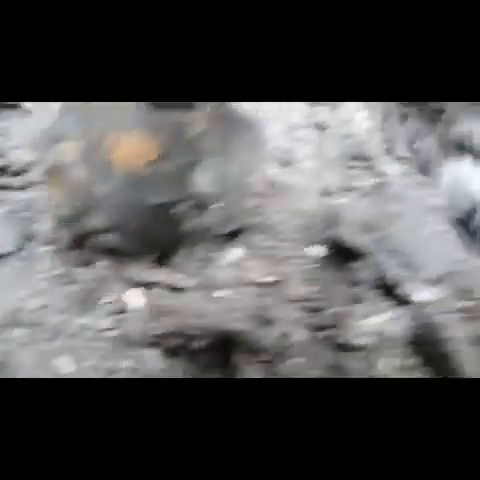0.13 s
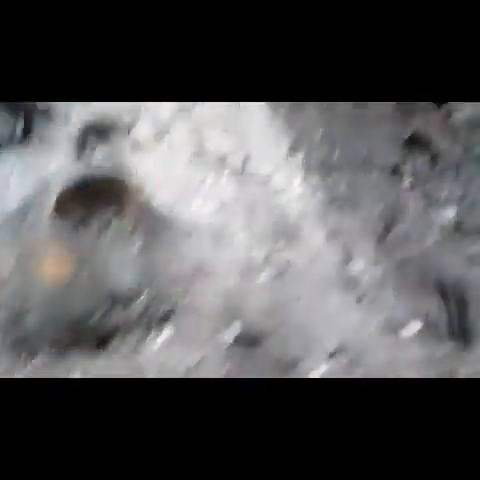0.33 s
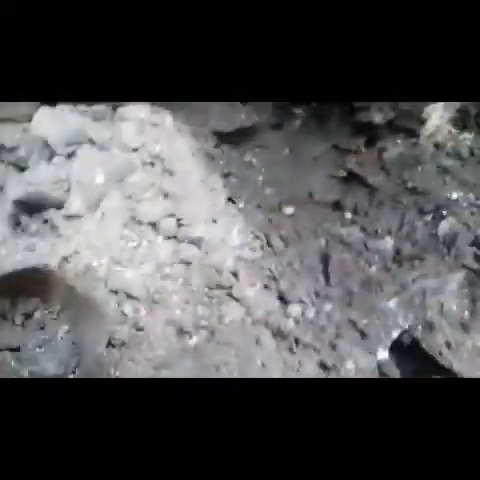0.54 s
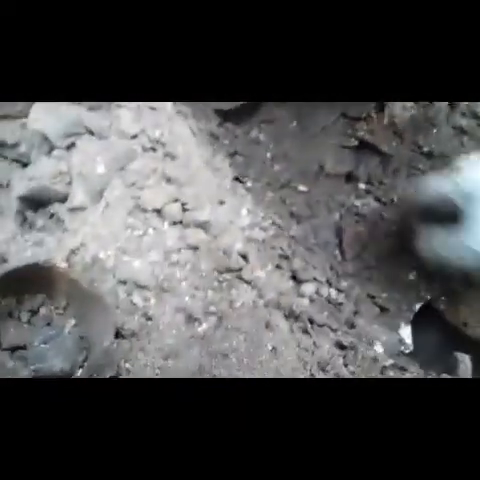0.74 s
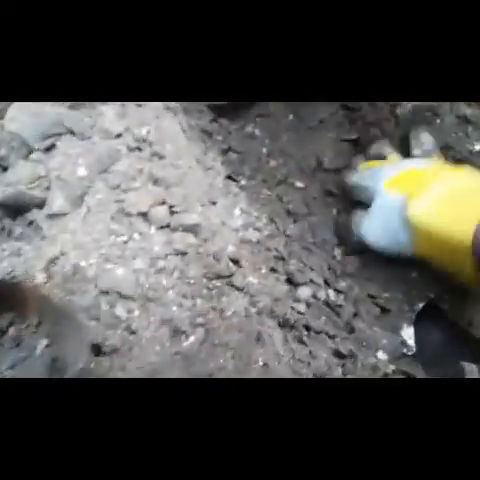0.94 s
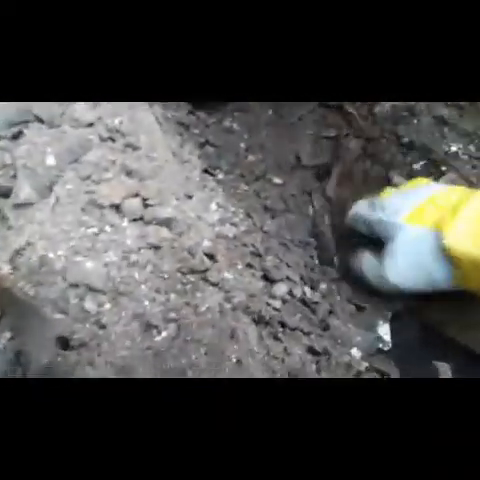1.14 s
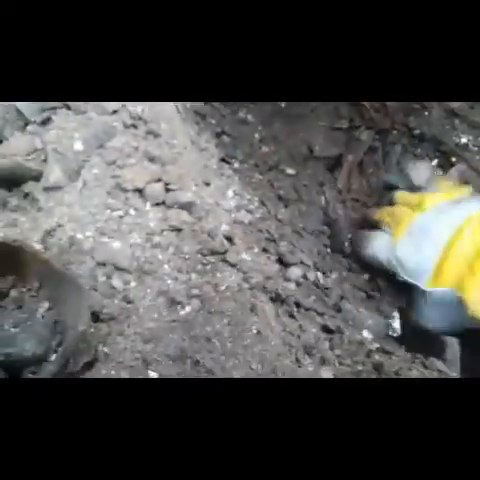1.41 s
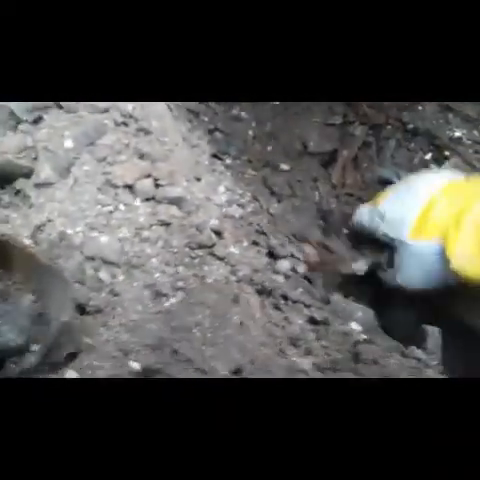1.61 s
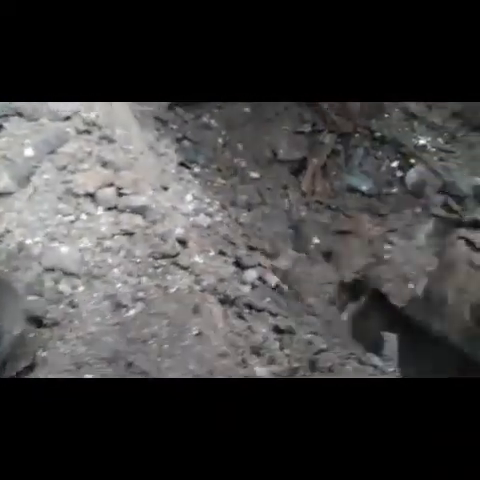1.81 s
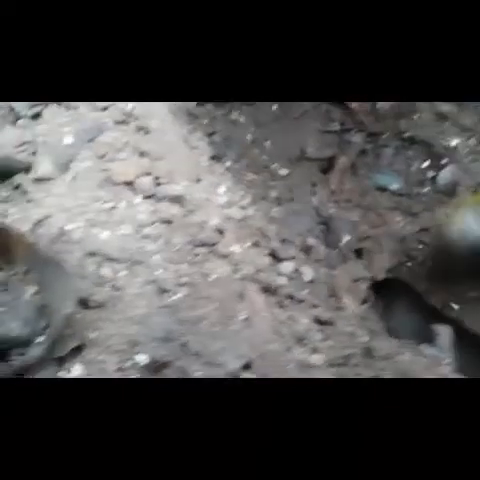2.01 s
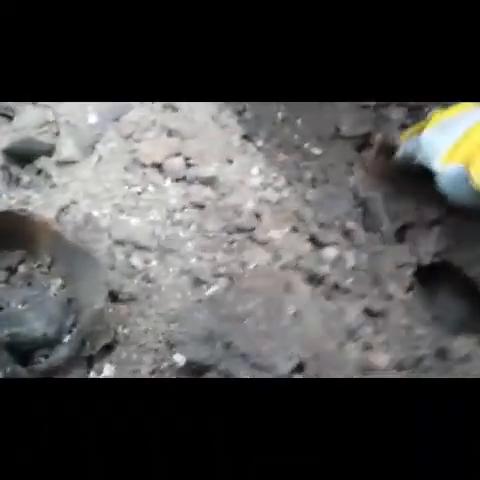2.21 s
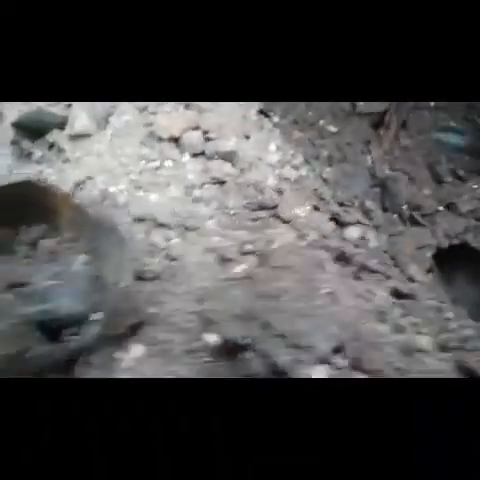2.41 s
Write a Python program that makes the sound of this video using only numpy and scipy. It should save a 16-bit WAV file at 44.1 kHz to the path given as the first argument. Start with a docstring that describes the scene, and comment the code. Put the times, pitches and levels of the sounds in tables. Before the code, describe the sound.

Gritty digging by hand: stiff sleeve rustling, pebbles grating, brief glass clinks, then loose stones ticking

```python
"""A waterproof sleeve rustles over a faint distant rumble as a gloved hand digs in gritty soil by a camera.
Grit scrapes under the glove and pebbles grate, all made of patchy, coloured noise slips;
a buried piece of glass clinks as a set of decaying sine modes, then loosened stones tick together.
Near the end something soft bumps the right side of the camera: a sine thud of falling pitch and a short rap."""
import sys
import numpy as np
from scipy import signal
from scipy.fft import rfft, irfft
from scipy.io import wavfile

SR = 44100
rng = np.random.default_rng(int(sys.argv[2]) if len(sys.argv) > 2 else 0)


def to_wav(s):
    """Save 16-bit WAV."""
    ch = np.atleast_2d(s).T  # columns
    pcm = np.round(np.clip(ch, -1, 1) * 32767)  # PCM
    wavfile.write(sys.argv[1], SR, pcm.astype(np.int16))


N = 112454


def amp(db):
    """Decibels to gain."""
    return 10 ** (np.asarray(db) / 20)


def evened(x):
    """Scales to an rms of one."""
    return x / np.sqrt(np.mean(x ** 2) + 1e-20)


def panned(db):
    """Left and right gains for a level difference; positive is louder on the left."""
    return amp(np.array([[db], [-db]]) / 2)


def add(mix, s, sound):
    """Mixes a stereo sound in at a time in seconds."""
    part = mix[:, max(round(s * SR), 0):][:, :sound.shape[1]]
    part += sound[:, :part.shape[1]]


def level(curve):
    """Gain through time from (s, dB) points, practically silent outside them."""
    return amp(np.interp(np.arange(N) / SR, *np.transpose(curve), left=-120, right=-120))


def pair(z, alike):
    """Makes two unrelated signals partly alike; `alike` is their correlation."""
    c = np.clip(alike, -.99, .99)
    return np.array([z[0], c * z[0] + np.sqrt(1 - c ** 2) * z[1]])


def coloured(x, spectrum, tilt_db=0):
    """Gives a signal a spectrum, and a tilt per octave above about 1 kHz, at an rms of one."""
    length = x.shape[-1]
    octave = np.log2(np.fft.rfftfreq(length, 1 / SR) + 1)
    hz, db = np.transpose(spectrum)
    gain_db = np.interp(octave, np.log2(hz), db) + tilt_db * np.clip(octave - 10, 0, None)
    return evened(irfft(rfft(x) * amp(gain_db), length))


def flutter(hz, depth_db):
    """Random unsteadiness of contact pressure: a slow noise that moves the level."""
    lowpass = 1 / (1 + (np.fft.rfftfreq(N, 1 / SR) / hz) ** 4)
    wander = irfft(rfft(rng.standard_normal(N)) * lowpass, N)
    return amp(depth_db * evened(wander))


def crackle(per_s, spread_db, smooth, alike):
    """Many tiny slips of uneven size over smooth friction noise."""
    size = amp(spread_db * np.minimum(rng.exponential(1, N), 4))
    slips = size * (rng.random(N) < per_s / SR)
    return pair(rng.standard_normal((2, N)), alike) * (evened(slips) + smooth)


PATCH_HZ, PATCH_S = 370, 0.01  # patch size, two standard deviations wide


def patchy(x, depth_db):
    """Each grain and crease has its own colour: random patches in time and pitch."""
    frame, hop = 512, 128
    z = signal.stft(x, nperseg=frame, noverlap=frame - hop)[2]
    across_pitch = signal.windows.gaussian(31, PATCH_HZ / 2 * frame / SR)
    across_time = signal.windows.gaussian(31, PATCH_S / 2 * SR / hop)
    spread = np.outer(across_pitch, across_time)
    field = evened(signal.fftconvolve(rng.standard_normal(z.shape[1:]), spread, "same"))
    gain = evened(amp(depth_db * np.minimum(field, 1.5)))
    return signal.istft(z * gain, nperseg=frame, noverlap=frame - hop)[1][:, :x.shape[1]]


SHARED_BASS_HZ = 736


def lagged(x, s):
    """The two close microphones share the bass; the left one hears the sound a little later."""
    lowpass = signal.butter(1, SHARED_BASS_HZ, fs=SR, output="sos")
    unshared = signal.sosfiltfilt(lowpass, (x[0] - x[1]) / 2)
    return np.array([np.roll(x[0] - unshared, round(s * SR)), x[1] + unshared])


# Tone of the distant rumble. Each row: frequency in Hz, relative level in dB.
AIR_TONE = [(20, -28), (45, -13.5), (65, 3), (85, 4), (115, -3.5), (500, -17), (1500, -34.5), (4000, -33.5),
            (14000, -40)]
AIR_DB = -60


def outdoors():
    """A low, steady rumble from far away: noise nearly alike in both ears."""
    rumble = coloured(pair(rng.standard_normal((2, N)), alike=0.94), AIR_TONE)
    return rumble * amp(AIR_DB) * panned(db=-2.5)


# Rub of the sleeve as the arm moves. Each row: time in seconds, level in dB before the sleeve trim.
SLEEVE_MOVES = [(0, -62.5), (.06, -50.5), (.21, -43), (.315, -43), (.325, -34), (.385, -38), (.48, -41.5),
                (.505, -35.5), (.585, -38.5), (.63, -48), (.88, -56.5), (1.04, -65), (1.09, -43.5),
                (1.135, -50), (1.22, -44.5), (1.228, -36), (1.3, -47), (1.37, -43), (1.45, -50.5),
                (1.53, -53.5), (1.68, -47.5), (1.71, -54), (1.74, -46), (1.82, -45), (1.9, -49.5),
                (1.92, -56.5), (2.0, -63), (2.08, -52.5), (2.16, -57), (2.22, -58), (2.35, -42),
                (2.43, -63), (2.48, -51), (2.55, -45)]
# Tone of the stiff cloth. Each row: frequency in Hz, relative level in dB.
CLOTH_TONE = [(71, -50), (120, -14), (205, -7.5), (338, -2.5), (780, -3), (1010, 2.5), (1910, -0.5),
              (3080, -12), (3690, -10), (4680, -15.5), (8020, -15), (9780, -31), (12700, -16), (14000, -33)]
# Swishing upper middle laid over the rub. Each row: time in seconds, gain of the added band in dB.
SWISH_GAIN = [(0, -36), (1.2, -4), (1.85, 3), (2.55, -5)]
# Folds that flap. Each row: start in seconds, length before the fade in seconds, level in dB before panning.
FOLD_FLAPS = [(0.321, 0.0089, -47.5), (0.359, 0.028, -41.5), (0.649, 0.022, -54.5), (1.67, 0.018, -50.5)]
# Hollow tone of a flapping fold. Each row: frequency in Hz, relative level in dB.
HOLLOW_TONE = [(60, -16), (170, -17.5), (280, 6.5), (400, -3), (800, -8.5), (1600, -45), (14000, -70)]
SWISH_HZ = (1530, 2380)
CREASES_PER_S, CREASE_SPREAD_DB = 3500, 1.8
SLEEVE_TRIM_DB, SLEEVE_LAG_S = -1.5, .00024
FLAP_RISE_S, FLAP_DECAY_S = 0.0028, 0.0084


def sleeve():
    """Creases of stiff cloth rub and snap, to the right of the camera; a few folds flap."""
    rub = coloured(crackle(CREASES_PER_S, CREASE_SPREAD_DB, smooth=0.3, alike=0.26), CLOTH_TONE)
    swish_band = signal.butter(2, SWISH_HZ, "band", fs=SR, output="sos")
    rub = rub + level(SWISH_GAIN) * signal.sosfiltfilt(swish_band, rub)
    movement = flutter(hz=66, depth_db=1.5) * level(SLEEVE_MOVES)
    out = patchy(rub, depth_db=4) * movement * amp(SLEEVE_TRIM_DB) * panned(db=0.5)
    t = np.arange(SR // 4) / SR
    for s, length, db in FOLD_FLAPS:
        air = coloured(pair(rng.standard_normal((2, len(t))), alike=0.8), HOLLOW_TONE)
        rise = np.minimum(t / FLAP_RISE_S, 1)
        fade = np.exp(-np.maximum(t - length, 0) / FLAP_DECAY_S)
        add(out, s, air * amp(db) * rise * fade * panned(db=-9.5))
    return lagged(out, SLEEVE_LAG_S)


# Grit dragged under the glove, one curve per stroke. Each row of a curve: time in seconds,
# level in dB before flutter and panning.
GLOVE_STROKES = [
    [(.12, -67), (.21, -45.5), (.3, -51), (.39, -39), (.43, -49.5), (.51, -39.5), (.57, -43), (.6, -41.5)],
    [(.6, -54), (.63, -37), (.64, -32), (.71, -32), (.72, -42.5), (.86, -47.5), (.9, -67), (.94, -51.5),
     (1.0, -70)],
    [(1.07, -61), (1.1, -47), (1.14, -71.5), (1.24, -47), (1.38, -48.5), (1.57, -68.5), (1.65, -52),
     (1.71, -64)],
    [(1.72, -49), (1.78, -54.5), (1.83, -35.5), (1.86, -71)],
    [(2.045, -57), (2.06, -39), (2.135, -46.5)],
]
# Tone of the grit. Each row: frequency in Hz, relative level in dB.
GRIT_TONE = [(200, -51), (1200, -9), (2000, 0.5), (2700, 9), (4000, 0.5), (6000, 6), (8200, 4.5),
             (9100, -5.5), (10800, -1.5), (14000, 0)]
GRAINS_PER_S, GRAIN_SPREAD_DB = 1100, 3


def scrape():
    """Grains of soil slip under the glove, stroke by stroke."""
    grains = coloured(crackle(GRAINS_PER_S, GRAIN_SPREAD_DB, smooth=1.0, alike=0.028), GRIT_TONE)
    pressure = flutter(hz=90.0, depth_db=2.0) * sum(level(stroke) for stroke in GLOVE_STROKES)
    return patchy(grains, depth_db=8.0) * pressure * panned(db=-2.0)


RISE_S, DECAY_S = .002, 0.0017
TAIL_DB, TAIL_S = -37, 0.038  # faint slower fade under the quick one


def contact(spectrum, ring_db, patchy_db, s, length, db, tilt_db, hz, pan_db=0):
    """A few milliseconds of gritty slips, in which the stone rings at its own pitch, then a quick fade."""
    t = np.arange(SR // 16) / SR
    after = np.maximum(t - length - RISE_S / 2, 0)
    fade = np.exp(-after / DECAY_S) + amp(TAIL_DB) * np.exp(-after / TAIL_S)
    shape = np.minimum(t / RISE_S, 1) ** 2 * fade
    noise = pair(rng.standard_normal((2, len(t))), alike=0.033)
    slips = patchy(coloured(noise, spectrum, tilt_db), patchy_db)
    # the ring is a quarter turn apart between the ears
    right_phase = rng.choice([-1, 1]) * np.pi / 2
    ring = np.sin(2 * np.pi * (hz * t + rng.random()) + np.array([[0], [right_phase]]))
    burst = evened(evened(slips * shape) + amp(ring_db) * evened(ring * shape))
    burst = burst * np.sqrt(np.mean(shape ** 2))
    return s - RISE_S / 2, burst * amp(db) * panned(pan_db)


# Pebbles grating on glass and each other. Each row: time in seconds, length in seconds,
# level in dB before panning, tilt in dB per octave, ring in Hz, left-right difference in dB.
PEBBLE_GRATES = [(.3215, .0032, -36.5, -20, 600, 3), (0.3562, 0.0011, -28, -6.5, 3400, -11),
                 (0.504, 0.0051, -36, -13, 1125, -4), (0.599, 0.0019, -19.5, -5.5, 3020, -.5),
                 (0.6376, 0.0017, -26, 2, 7720, 2), (0.6455, 0.0031, -27.5, 1, 5360, -1),
                 (0.658, .004, -30, -0.5, 3780, -12.5), (0.6966, 0.0015, -18.5, 2, 5650, -1),
                 (0.707, 0.0034, -29, 5.5, 10400, -5), (0.736, 0.0081, -27.5, -.5, 7870, -1),
                 (0.769, 0.0026, -35, -6.5, 5570, -1), (0.784, .006, -30.5, 3, 8450, -4),
                 (0.8116, 0.0042, -29, 0.5, 6260, -6), (0.9104, 0.0029, -25.5, 3, 6380, 2),
                 (1.0156, .0025, -24.5, -1, 8050, -4), (1.226, 0.0035, -38, -14.5, 1390, -4),
                 (1.4822, .005, -26.5, -0.5, 6370, -3), (1.7282, 0.0028, -37.5, -5.5, 2060, 3),
                 (1.81, 0.0035, -38.5, -6, 6300, 5), (2.317, 0.0031, -41.5, -9.5, 1120, -1)]
# Tone of a grating pebble. Each row: frequency in Hz, relative level in dB.
PEBBLE_TONE = [(200, -18.5), (1000, -9), (2300, -3), (3700, 4), (4500, -2), (5600, 6), (7200, -1.5),
               (8150, 11.5), (9200, -8.5), (11000, -8.5), (12500, -4.5), (14000, 3.5)]
# Loose stones ticking together. Each row: time in seconds, length in seconds,
# level in dB before panning, tilt in dB per octave, ring in Hz.
STONE_TICKS = [(1.8395, 0.0052, -34.5, -2, 10900), (1.868, 0.0048, -41.5, -28, 1430),
               (1.8756, 0.0017, -33, 7, 10900), (1.8954, .003, -33.5, -7, 1100),
               (1.935, 0.0049, -39.5, -5, 2170), (1.967, .004, -37.5, -3, 4790),
               (2, 0.0026, -44.5, -4, 4900), (2.0168, 0.0024, -35, 3, 8000),
               (2.0214, 0.0058, -33.5, -1, 5500), (2.035, 0.0022, -36, -8, 2740),
               (2.054, 0.0024, -35, -2.5, 6260), (2.061, 0.0025, -27.5, 0, 12250),
               (2.082, .004, -39, -7, 6300), (2.102, .002, -38.5, -5, 6650),
               (2.112, 0.0016, -35.5, -6.5, 7970), (2.14, 0.0045, -35, -1, 5360),
               (2.178, 0.0036, -39.5, -1, 4770), (2.189, 0.0061, -28, 0, 12530),
               (2.199, 0.018, -35.5, -3, 4740), (2.225, 0.0036, -38.5, -2.5, 6380),
               (2.24, 0.0042, -27.5, -1.5, 4770), (2.251, 0.0024, -42.5, -3, 11200),
               (2.262, 0.0038, -42, -0.5, 2450), (2.2844, .003, -33, 0.5, 2347)]
# Tone of a ticking stone. Each row: frequency in Hz, relative level in dB.
STONE_TONE = [(200, -30), (1200, -11.5), (2450, 3.5), (3150, -10.5), (3700, 0), (4250, -8.5), (4800, 7),
              (5800, -3.5), (6350, 6), (7150, -4.5), (8050, 6.5), (9400, -14), (11000, -6.5), (12350, 1),
              (14000, -25)]
# ring level against the slips, and depth of the patches
PEBBLE_RING_DB, PEBBLE_PATCHY_DB = -8.5, 4.5
STONE_RING_DB, STONE_PATCHY_DB = -3, 8
CRUMBS, CRUMB_SPAN_S, CRUMB_HZ = 64, (1.8, 1.9), (1990, 11000)
CRUMB_FLOOR_DB, CRUMB_SPREAD_DB = -45, 2  # softest crumb, and mean rise above it


def stones():
    """Pebbles grate, loosened stones tick, and small crumbs trickle down between them."""
    out = np.zeros((2, N))
    pebble = PEBBLE_TONE, PEBBLE_RING_DB, PEBBLE_PATCHY_DB
    stone = STONE_TONE, STONE_RING_DB, STONE_PATCHY_DB
    for row in PEBBLE_GRATES:
        add(out, *contact(*pebble, *row))
    for row in STONE_TICKS:
        add(out, *contact(*stone, *row, pan_db=rng.normal(0, 1.5)))
    for _ in range(CRUMBS):
        s, hz = rng.uniform(*CRUMB_SPAN_S), rng.uniform(*CRUMB_HZ)
        db = CRUMB_FLOOR_DB + CRUMB_SPREAD_DB * rng.exponential(1)
        add(out, *contact(*stone, s, length=0, db=db, tilt_db=0, hz=hz, pan_db=rng.uniform(-5, 5)))
    return out


# Modes of the buried glass. Each row: frequency in Hz before detuning, relative level in dB,
# time to fall 60 dB in seconds.
GLASS_MODES = [(2660, -2.5, 0.14), (3666, -15, 0.11), (3720, 2.5, 0.076), (5360, -8, 0.053),
               (5780, -4.5, 0.12), (6105, -17, 0.17), (7930, 1.5, 0.062), (8220, -6.5, .11),
               (12400, -16, .07)]
# Clinks on the glass. Each row: start in seconds, level in dB before the mode levels and panning,
# most excited frequency in Hz.
GLASS_CLINKS = [(.6, -26, 3960), (.682, -27.5, 2250), (.697, -30.5, 6800), (.738, -30, 8800),
                (0.744, -35, 4540), (.94, -49, 5400)]
CLINK_OCTAVES = 0.45  # distance at which a mode is excited half as strongly
RATTLE_DB, DETUNE = 2, 0.003


def glass():
    """Each clink rings the modes near one frequency most strongly, while their level wobbles."""
    out, t = np.zeros((2, N)), np.arange(SR // 3) / SR
    for s, db, centre_hz in GLASS_CLINKS:
        ring = 0
        for hz, mode_db, t60 in GLASS_MODES:
            right_phase = rng.choice([-1, 1]) * 0.89
            phase = 2 * np.pi * rng.random() + np.array([[0], [right_phase]])
            weight = 1 / (1 + (np.log2(hz / centre_hz) / CLINK_OCTAVES) ** 4)
            detuned_hz = hz * (1 + DETUNE * rng.uniform(-0.89, 1))
            decay = amp(mode_db - 60 * t / t60)
            ring = ring + weight * decay * np.sin(2 * np.pi * detuned_hz * t + phase)
        rattle = flutter(hz=121, depth_db=RATTLE_DB)[:len(t)]
        add(out, s, ring * rattle * amp(db) * np.minimum(t / RISE_S, 1) * panned(db=-6))
    return out


BUMP_S, BUMP_LEFT_DB = 2.1893, -45  # start, and left level against the right
THUD_DB, THUD_DECAY_S = -15.5, 0.013
THUD_START_HZ, THUD_END_HZ, THUD_FALL_S = 563, 27, 0.00082
RAP_HZ, RAP_DB, RAP_DECAY_S = 810, -13.5, 0.00067


def bump():
    """Something soft knocks the camera beside the right microphone: a falling thud and a rap of the case."""
    out, t = np.zeros((2, N)), np.arange(SR // 5) / SR
    hz = THUD_END_HZ + (THUD_START_HZ - THUD_END_HZ) / (1 + t / THUD_FALL_S)
    thud = amp(THUD_DB) * np.exp(-t / THUD_DECAY_S) * np.sin(2 * np.pi * np.cumsum(hz) / SR)
    rap = amp(RAP_DB) * np.exp(-t / RAP_DECAY_S) * np.sin(2 * np.pi * RAP_HZ * t)
    add(out, BUMP_S, -(thud + rap) * amp([[BUMP_LEFT_DB], [0]]))
    return out


def scene():
    """All sources at the two microphones."""
    return outdoors() + sleeve() + scrape() + stones() + glass() + bump()


EDGE_HZ = 13000


def record(dry):
    """The recorder's band limit: a lowpass that removes the top treble."""
    lowpass = signal.firwin(121, EDGE_HZ, window=("kaiser", 3.5), fs=SR)
    return signal.oaconvolve(dry, lowpass[None], "same", axes=1)


dry = scene()
out = record(dry)
to_wav(out)
```